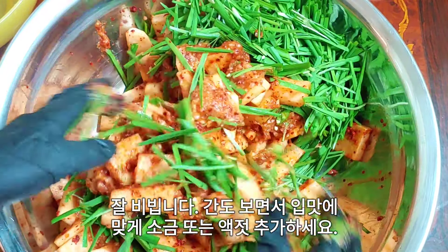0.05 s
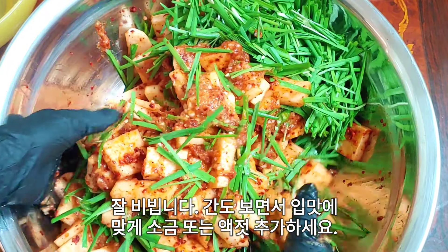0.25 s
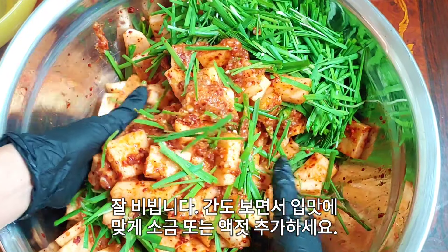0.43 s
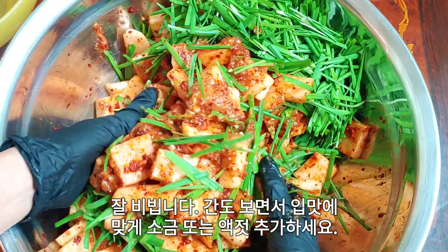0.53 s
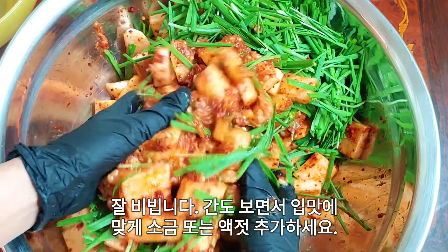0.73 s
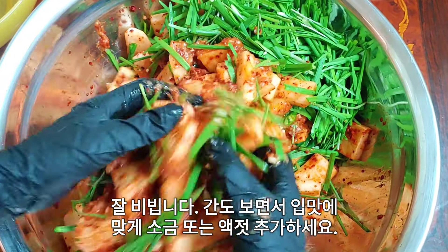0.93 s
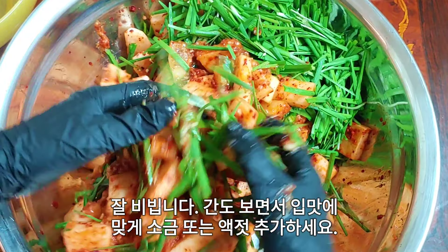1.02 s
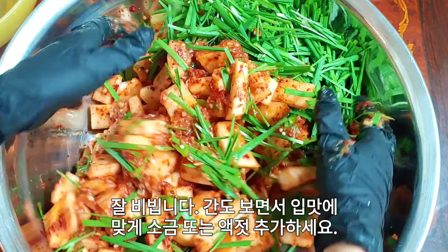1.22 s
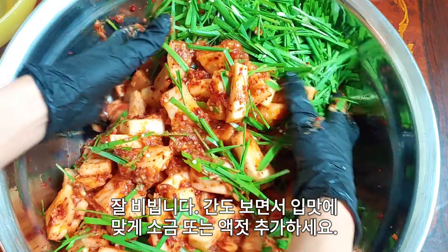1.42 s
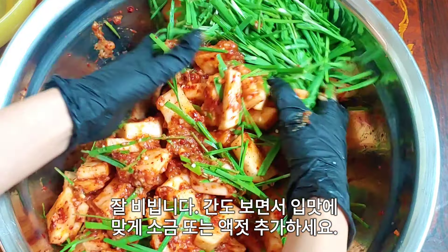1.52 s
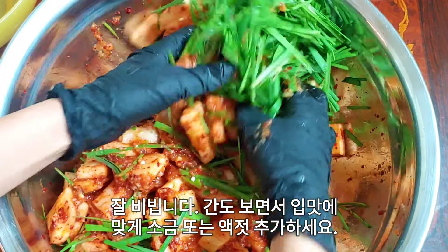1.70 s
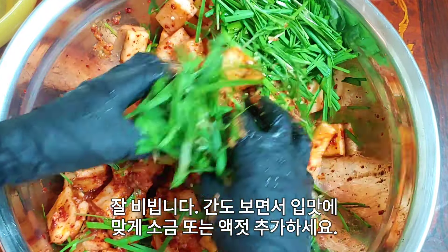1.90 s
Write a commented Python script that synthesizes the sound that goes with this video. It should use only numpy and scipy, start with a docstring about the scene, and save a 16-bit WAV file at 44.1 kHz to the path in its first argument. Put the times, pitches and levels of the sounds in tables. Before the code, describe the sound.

Sticky squelching and crackling come in uneven strokes as hands mix paste-coated vegetables near a stereo microphone in a kitchen. Pieces thud into a dully ringing metal bowl, a short air puff rumbles on the left, then the mixing swells again.

```python
"""Wet radish cubes and chives, tossed by gloved hands in a big steel bowl; kitchen, close stereo microphone.
With each stroke the sticky paste crackles as tiny films tear and squelches as air pockets pop.
Stems crunch, juice squirts, cubes knock and thud down, and the loaded bowl rings dully.
On the middle stroke a puff of air buffets the left microphone."""
import sys
import numpy as np
from scipy import signal
from scipy.fft import rfft, irfft, next_fast_len
from scipy.io import wavfile

SR = 44100
rng = np.random.default_rng(int(sys.argv[2]) if len(sys.argv) > 2 else 0)


def inscribe(sig):
    """Save sig as 16-bit PCM at rate SR to the path in sys.argv[1].

    A 1-D sig is mono; a 2-D sig holds one channel per row.
    Samples are clipped to [-1, 1] before scaling.
    """
    pcm = np.round(np.clip(np.atleast_2d(sig).T, -1, 1) * 32767)
    wavfile.write(sys.argv[1], SR, pcm.astype(np.int16))


N = 85995
T = np.arange(N) / SR
MIC_LAG_S = .00018  # scatter of arrival times at the microphones


def undb(db):
    """Decibels to gain."""
    return 10 ** (np.asarray(db) / 20)


def unit(x):
    """Scale to rms 1."""
    return x / np.sqrt(np.mean(x ** 2))


def curve(rows, column=1):
    """Gain over time through rows of (time [s], level [dB], ...)."""
    rows = np.array(rows)
    return undb(np.interp(T, rows[:, 0], rows[:, column]))


def swells(rows):
    """One arch of gain for each row of (time [s], length [s], level [dB])."""
    return sum(undb(db) * np.sin(np.pi * np.clip((T - s) / length, 0, 1)) for s, length, db in rows)


def add(out, s, x):
    """Mix a short sound in at time s."""
    i = max(int(s * SR), 0)
    out[:, i:i + x.shape[-1]] += x[..., :max(N - i, 0)]


def colour(x, points):
    """Causal filter through (frequency [Hz], gain [dB]) points; the result has rms 1."""
    size = 2 * next_fast_len(N)
    hz, db = np.array(points).T
    gain = undb(np.interp(np.log(np.fft.rfftfreq(size, 1 / SR) + 1), np.log(hz), db))
    cepstrum = irfft(np.log(gain))
    cepstrum[1:size // 2] *= 2  # fold to minimum phase
    cepstrum[size // 2 + 1:] = 0
    return unit(irfft(rfft(x, size) * np.exp(rfft(cepstrum)))[..., :N])


def bubble(hz, cycles, glide):
    """A damped ring whose pitch rises by glide as it dies."""
    u = np.arange(int(2 * cycles / hz * SR) + 2) * hz / SR / cycles
    return np.sin(2 * np.pi * cycles * (u + glide * u * u / 2)) * np.exp(-np.pi * u)


def pop(hz, cycles):
    """A rounded ring that swells and dies; its envelope peaks at 1."""
    u = np.arange(int(3.5 * cycles / hz * SR) + 2) * hz / SR / cycles
    return np.sin(2 * np.pi * cycles * u) * (np.pi * u) ** 2 * np.exp(2 - 2 * np.pi * u)


def grains(per_s, lo_hz, hi_hz, cycles, spread_db, width_db, glide=0):
    """A steady shower of small pops, each with its own pitch, size and place."""
    out = np.zeros((2, N))
    for when, pitch, size, side, lag, life in rng.random((int(per_s * N / SR), 6)):
        hz = lo_hz * (hi_hz / lo_hz) ** pitch
        grain = bubble(hz, cycles * (.5 + life), glide) * undb(-spread_db * np.log(size + .01))
        for mic, sign in enumerate((1, -1)):
            arrival = when * N / SR + sign * (lag - .5) * MIC_LAG_S * 2
            add(out[mic:mic + 1], arrival, grain * undb(sign * width_db * (side - .5)))
    return out


# Hands working the sticky paste, close up (time [s], relative level [dB])
CRACKLE_LEVELS = [(0, -51), (.03, -61), (.09, -56), (.11, -73), (.155, -59), (.172, -41), (.188, -39.5),
                  (.228, -31.5), (.24, -34), (.265, -33.5), (.3, -30.5), (.35, -33), (.4, -50),
                  (.45, -42.5), (.545, -42.5), (.6, -62.5), (.635, -68.5), (.665, -42), (.7, -53.5),
                  (.78, -50), (.86, -60), (.94, -67), (1.02, -60.5), (1.052, -49.5), (1.09, -68),
                  (1.14, -64), (1.165, -49), (1.238, -52), (1.246, -37.5), (1.285, -42.5), (1.345, -44.5),
                  (1.41, -41), (1.47, -40), (1.543, -38), (1.556, -29), (1.628, -30), (1.648, -39.5),
                  (1.678, -31), (1.715, -46), (1.765, -46), (1.79, -38.5), (1.84, -49.5), (1.865, -44.5),
                  (1.9, -56), (1.928, -44.5), (1.95, -67)]
# Bright tone of the crackle (frequency [Hz], gain [dB])
CRACKLE_TONE = [(1000, -64), (3400, -14.5), (4700, -12), (6200, -10.5), (7200, -1.5), (8100, -2),
                (9200, -8.5), (11000, -13), (13000, -24), (16000, -34)]


def crackle():
    """Tiny films of paste tear on the gloves, over a softer fizz."""
    films = grains(2200, 3740, 10900, cycles=.92, spread_db=-2.5, width_db=-7)
    fizz = grains(600, 4270, 9000, cycles=50, spread_db=2.5, width_db=16.5, glide=.005)
    return colour(unit(films) + undb(-6) * unit(fizz), CRACKLE_TONE) * curve(CRACKLE_LEVELS) * undb(-5)


# Strokes in the bowl, one list each (time [s], relative squelch level [dB], relative slosh level [dB])
STROKES = [
    [(0.0, -60, -41.5), (0.008, -59.5, -50), (0.054, -73, -61), (0.074, -64.5, -61.5), (0.088, -74, -60),
     (0.15, -81, -82)],
    [(0.16, -59, -78), (0.172, -48.5, -60), (0.336, -54, -45.5), (0.362, -49, -48), (0.38, -42, -50),
     (0.39, -50, -45.5), (0.546, -44.5, -41), (0.62, -68.5, -62)],
    [(0.63, -62.5, -56), (0.68, -47.5, -47), (0.8, -54.5, -53.5), (0.93, -71.5, -69), (1.0, -63, -78),
     (1.05, -59.5, -64.5), (1.1, -69, -71)],
    [(1.14, -70.5, -71), (1.166, -55.5, -59), (1.18, -55.5, -58), (1.23, -60.5, -59), (1.258, -56.5, -55.5),
     (1.416, -52.5, -55.5), (1.48, -47.5, -44.5), (1.53, -46.5, -42)],
    [(1.553, -46.5, -35), (1.561, -43, -36), (1.598, -44.5, -42), (1.646, -45.5, -40), (1.68, -44.5, -40),
     (1.745, -58.5, -49.5), (1.846, -58.5, -61.5), (1.95, -65.5, -62)],
]
# Tone of the air pockets (frequency [Hz], gain [dB])
SQUELCH_TONE = [(500, -55.5), (1200, -6.5), (1850, -2), (2600, -2), (3500, -4), (5000, -4.5), (8000, -5),
                (15000, -25)]
# Tone of the sloshing juice (frequency [Hz], gain [dB])
SLOSH_TONE = [(200, -33), (450, -3), (700, -1), (1050, 0), (1400, -8), (2500, 7), (6000, -15)]


def squelch():
    """Air pockets pop in the paste, a few bubbles ring on and juice sloshes lower down."""
    pockets = grains(1100, 1160, 6500, cycles=2.8, spread_db=1, width_db=13.5, glide=.059)
    bubbles = grains(320, 779, 3046, cycles=24, spread_db=2.5, width_db=-7, glide=.016)
    juice = grains(600, 526, 1504, cycles=7.1, spread_db=3.5, width_db=1, glide=.036)
    effort = np.vstack(STROKES)
    squish = colour(unit(pockets) + undb(-4.5) * unit(bubbles), SQUELCH_TONE) * curve(effort)
    slosh = colour(juice, SLOSH_TONE) * curve(effort, column=2)
    return undb(-.5) * squish + undb(-6.5) * slosh


# Cubes turning over in the bowl (time [s], relative level [dB])
TUMBLE_LEVELS = [(0, -57), (.06, -57.5), (.15, -58.5), (.21, -43.5), (.28, -51), (.32, -42), (.4, -49.5),
                 (.6, -51.5), (.7, -56.5), (.87, -40), (.92, -59.5), (1.0, -64.5), (1.12, -59.5),
                 (1.19, -44), (1.36, -41), (1.52, -60.5), (1.57, -38), (1.63, -48.5), (1.69, -43),
                 (1.87, -64), (1.95, -39.5)]
# Dull tone of the heap (frequency [Hz], gain [dB])
TUMBLE_TONE = [(25, -29), (60, -8.5), (125, 1.5), (180, 0.5), (330, -0.5), (500, 0.5), (800, -17.5),
               (2000, -75)]


def tumble():
    """Soft cubes roll over the heap in a shower of low bumps."""
    bumps = grains(450, 66, 900, cycles=2.27, spread_db=2, width_db=-.5)
    return colour(bumps, TUMBLE_TONE) * curve(TUMBLE_LEVELS) * undb(-3.5)


# Background on both microphones (frequency [Hz], gain [dB])
FLOOR_TONE = [(20, 13), (110, 1), (300, -22), (1000, -12.5), (4000, -43), (9000, -13), (16000, -28)]


def noise_floor():
    """A faint, steady rumble and hiss."""
    return undb(-69) * colour(rng.standard_normal((2, N)), FLOOR_TONE)


# Cubes landing in the bowl (time [s], level [dB], thump pitch [Hz], relative ring level [dB])
LANDINGS = [(0.081, -33.5, 132.4, -27.5), (0.203, -30, 138, -13), (.301, -33.5, 261.4, -9.5),
            (.322, -29.5, 138, -21), (0.434, -39.5, 136, -8.5), (0.521, -38.5, 132.6, -12),
            (0.609, -42, 152, -25), (0.7892, -36, 272, -30), (0.862, -30, 334.7, -11.5),
            (1.177, -34.5, 266.4, -18), (1.254, -26, 118.5, -11.5), (1.34, -33.5, 143, -13),
            (1.345, -35.5, 411, -4.5), (1.557, -41, 333, -15), (1.667, -43, 156, 1.5),
            (1.903, -37.5, 136, -5), (1.926, -56, 141, -21)]
# Modes of the loaded steel bowl (frequency [Hz], relative level [dB], 60 dB decay time [s])
BOWL_MODES = [(223.7, 4, 0.24), (278.8, 4.5, 0.12), (362.8, 1.5, 0.17), (441, 5.5, 0.065),
              (529, -1.5, 0.31), (705, -8.5, 0.085)]


def thuds(rise_s=.014, decay_s=.013, contact_s=.0045):
    """Each landing thumps the table and rings the bowl."""
    out = np.zeros((2, N))
    t = T[:N // 4]
    for s, db, hz, ring_db in LANDINGS:
        thump = 2 * np.sin(2 * np.pi * hz * t) * (1 - np.exp(-t / rise_s)) * np.exp(-t / decay_s)
        ring = 0
        for mode_hz, mode_db, t60 in BOWL_MODES:
            fade = undb(mode_db + 2 * rng.standard_normal() - 60 * t / t60)
            ring += fade * np.sin(2 * np.pi * (mode_hz * t + rng.random()))
        add(out, s, undb(db) * (thump + undb(ring_db) * ring / 2 * (1 - np.exp(-t / contact_s))))
    return out


# Wet films snapping close by (time [s], level [dB], pitch [Hz], decay [s], left minus right [dB])
FILM_SNAPS = [(0.1677, -41.5, 4830, 0.0042, -4), (.168, -39.5, 7850, 0.0071, -9),
              (0.1917, -27, 8000, 0.0049, -6), (0.192, -31.5, 4700, 0.007, 1.5),
              (.2322, -14, 7370, 0.0093, 1), (0.2306, -28, 4680, 0.0034, 1),
              (0.2584, -25.5, 7600, 0.012, -14.5), (0.2609, -23, 7800, 0.0005, -3),
              (0.298, -23, 7850, .0005, -9), (.3233, -18.5, 7840, 0.00058, -1),
              (.3234, -28, 5370, 0.00035, 0), (0.519, -31, 7550, 0.0005, 5),
              (0.54, -25.5, 7200, 0.00079, 14), (1.2447, -35.5, 7400, 0.006, 10),
              (1.2985, -15.5, 7500, 0.00036, 6.5), (1.2987, -26, 5560, 0.0023, 1),
              (1.2995, -36, 12100, 0.0015, 1), (1.339, -37, 5030, 0.018, 9.5)]


def snaps(cycles=4.94, gap_s=.0007):
    """A film lets go with one sharp pop, then a quick run of fading ones."""
    out = np.zeros((2, N))
    for s, db, hz, decay, pan_db in FILM_SNAPS:
        gain = undb(db) * undb(np.array([[pan_db], [-pan_db]]) / 2)
        add(out, s, gain * pop(hz, cycles * 2))
        add(out, s + gap_s / 2, gain * undb(-14) * pop(hz=8700, cycles=3))  # the hard edge
        for k, (jitter, detune, lag) in enumerate(rng.random((20, 3))):
            delay = (k + 1 + jitter / 2) * gap_s
            tear = gain * pop(hz * (1 + .34 * (detune - .5)), cycles) * np.exp(-delay / decay)
            add(out[:1], s + delay, tear[0])
            add(out[1:], s + delay + (lag - .5) * MIC_LAG_S, tear[1])
    return out


# Chive stems crushed in the hands (time [s], level [dB], decay [s])
STEM_CRUNCHES = [(0.1716, -45, 0.0052), (0.538, -49, .004), (0.67, -42.5, 0.044), (1.2992, -35.5, 0.0025),
                 (1.5556, -45, 0.0021), (1.563, -42.5, 0.058), (1.665, -41.5, 0.0085), (1.729, -41, 0.0034)]
# Crisp tone of the stems (frequency [Hz], gain [dB])
CRUNCH_TONE = [(250, -26), (700, -6), (2300, -9), (3600, 5), (7000, 6), (10000, -6), (16000, -25)]


def crunches():
    """Stems give way in a burst of tiny cracks that starts at once and dies fast."""
    cracks = grains(3000, 275, 9300, cycles=.85, spread_db=-.5, width_db=4)
    bursts = sum(undb(db) * (T > s) * np.exp(-abs(T - s) / decay) for s, db, decay in STEM_CRUNCHES)
    return colour(cracks, CRUNCH_TONE) * bursts


# A glove sliding through the soft paste (time [s], length [s], level [dB])
GLOVE_SLIDES = [(.36, 0.17, -51.5), (.77, 0.12, -54.5), (.98, 0.092, -58.5)]
# Muffled tone of the slide (frequency [Hz], gain [dB])
SMEAR_TONE = [(700, -27), (1500, 4.5), (2600, -1.5), (3400, -20)]


def smears():
    """A sliding glove presses small air pockets out of the paste: a dull, wet swell."""
    pockets = grains(1200, 1150, 2850, cycles=2.2, spread_db=4, width_db=4)
    return colour(pockets, SMEAR_TONE) * swells(GLOVE_SLIDES)


# Juice squirting, a little right of centre (time [s], level [dB], pitch [Hz], length [s])
JUICE_SQUIRTS = [(0.372, -37.5, 1750, 0.0076), (0.374, -35, 2160, 0.0063), (0.431, -40, 1790, 0.018),
                 (0.482, -44, 2010, 0.0093), (1.043, -51.5, 2150, 0.0048), (1.468, -41, 1840, 0.0087),
                 (1.756, -42.5, 2070, 0.0028)]


def squirts(fade_db=7):
    """Juice squeezed out between the pieces makes four fading bubbles around one pitch."""
    out = np.zeros((2, N))
    for s, db, hz, length in JUICE_SQUIRTS:
        for k, (when, detune, side) in enumerate(rng.random((4, 3))):
            pan = undb(1.9 * (side - 1.5) * np.array([[1], [-1]]))
            blip = pop(hz * (1 + .1 * (detune - .5)), cycles=18)
            add(out, s + (k + when) * length / 5, pan * undb(db - k * fade_db) * blip)
    return out


# Gusts right on the left microphone (time [s], length [s], level [dB])
MIC_GUSTS = [(0.674, 0.02, -22.5), (0.69, 0.063, -20), (0.757, 0.022, -28), (0.78, 0.03, -15.5),
             (0.805, 0.044, -16), (0.843, 0.0354, -27.5), (0.867, 0.12, -49), (.96, 0.08, -53)]
# Low tone of the eddies (frequency [Hz], gain [dB])
EDDY_TONE = [(15, -14), (35, -14), (65, 0.5), (130, -3.5), (170, -13), (280, -23.5), (450, -25.5),
             (800, -66), (2000, -67)]


def air_puff():
    """Eddies rumble on the left microphone and barely reach the right."""
    eddies = signal.hilbert(colour(rng.standard_normal((2, N)), EDDY_TONE))
    evened = eddies.real / (abs(eddies) + .5)  # flatten the random swings in level
    rumble = colour(evened, [(20, 0), (300, 6), (600, -14.5), (1500, -20)])
    return rumble * swells(MIC_GUSTS) * undb([[0], [-33]])


# Radish cubes hitting each other, dead centre (time [s], level [dB], pitch [Hz])
CUBE_KNOCKS = [(0.7907, -34.5, 443), (.9925, -40.5, 2070), (1.2215, -43.5, 3000), (1.5562, -29.5, 1000),
               (1.5567, -26.5, 2640), (1.564, -28.5, 750), (1.5725, -30, 372), (1.577, -32, 1000)]


def knocks():
    """Firm cubes meet with a short, dead crack."""
    out = np.zeros((2, N))
    for s, db, hz in CUBE_KNOCKS:
        add(out, s, undb(db) * pop(hz, cycles=3))
    return out


# The bowl rocking on the table (time [s], level [dB])
ROCK_LEVELS = [(1.38, -85), (1.45, -49), (1.54, -65), (1.68, -43.5), (1.8, -53.5), (1.9, -73)]


def rocking(hz=59.4):
    """The bowl rocks a little near the end, with a low hum."""
    return curve(ROCK_LEVELS) * np.sin(2 * np.pi * hz * T) * (T > ROCK_LEVELS[0][0])


# Echoes from inside the bowl (left delay [s], right delay [s], level [dB])
STEEL_ECHOES = [(.0011, 0.0009, -25.5), (.0023, 0.0022, -18.5), (.0034, 0.0048, -17.5)]


def bowl_echoes(x):
    """The steel wall throws the rustle back within a few milliseconds."""
    out = x.copy()
    for left_s, right_s, db in STEEL_ECHOES:
        add(out[:1], left_s, undb(db) * x[0])
        add(out[1:], right_s, undb(db) * x[1])
    return out


def kitchen_echo(x, t60_s=.096):
    """The kitchen walls return a short, diffuse tail with little bass."""
    t = T[:N // 4]
    walls = rng.standard_normal((2, len(t))) * undb(-60 * t / t60_s) * (t > .003)
    walls /= np.sqrt(np.sum(walls ** 2, axis=1, keepdims=True))
    tail = signal.fftconvolve(x, walls, axes=1)[:, :N]
    return signal.sosfilt(signal.butter(2, 250, "high", fs=SR, output="sos"), tail)


def scene():
    """The bowl close up, the kitchen behind it and a puff of air on the microphone."""
    rustle = bowl_echoes(crackle() + squelch() + smears() + crunches())
    bowl = rustle + snaps() + squirts() + knocks() + tumble() + thuds() + rocking()
    return bowl + undb(-4) * kitchen_echo(bowl) + air_puff() + noise_floor()


# Resonances of the microphone ports, left then right (frequency [Hz], level [dB])
MIC_PORTS = [(7200, -6.5), (8200, -9.5)]


def record(dry):
    """Each microphone port rings in the treble; the recorder cuts the top above 15.8 kHz."""
    heard = np.array([x + undb(db) * signal.lfilter(*signal.iirpeak(hz, Q=7, fs=SR), x)
                      for x, (hz, db) in zip(dry, MIC_PORTS)])
    return signal.sosfilt(signal.ellip(8, .2, 70, 15800, fs=SR, output="sos"), heard)


dry = scene()
out = record(dry)
inscribe(out)
```